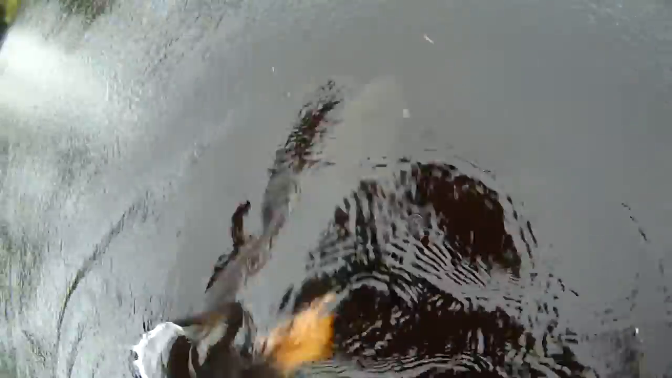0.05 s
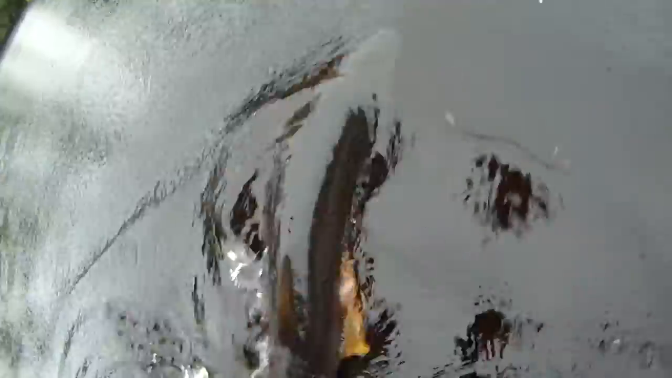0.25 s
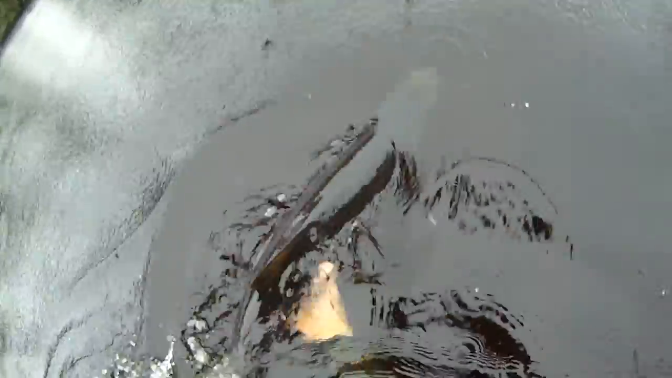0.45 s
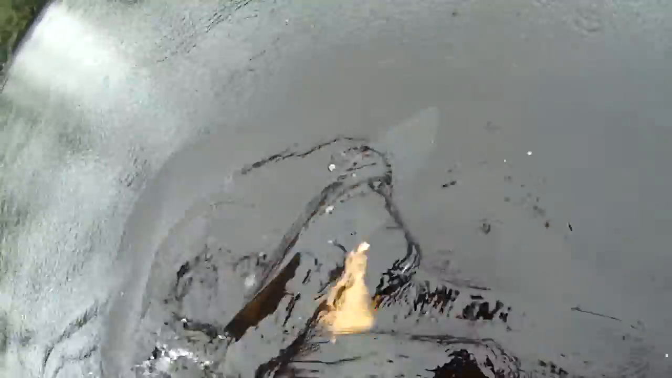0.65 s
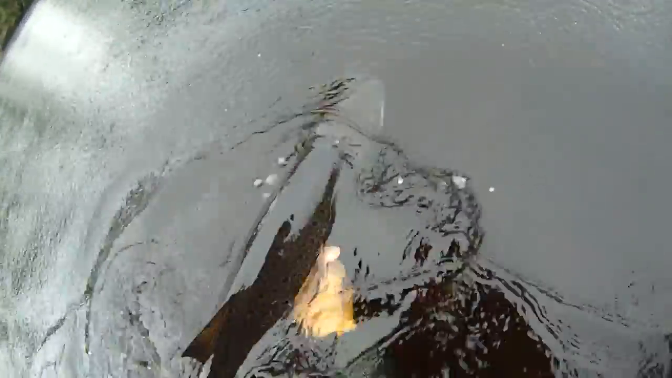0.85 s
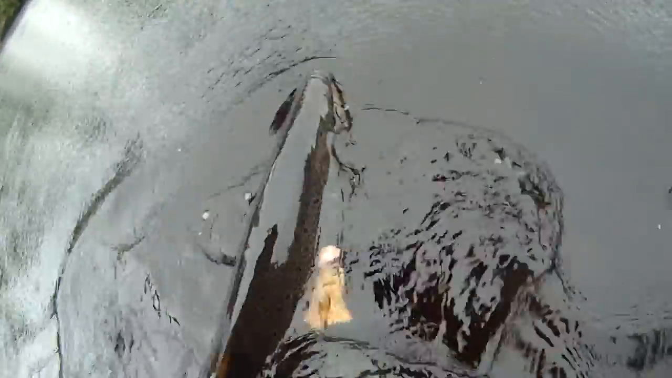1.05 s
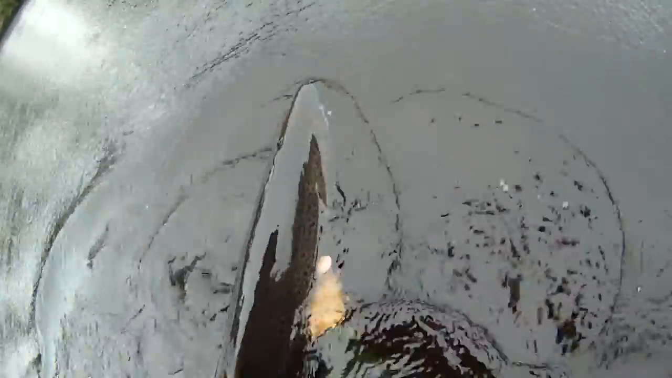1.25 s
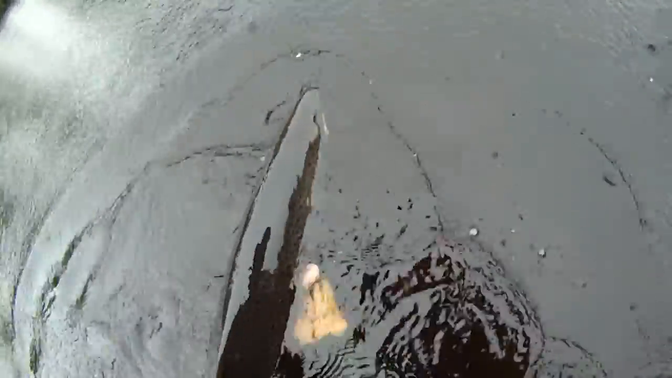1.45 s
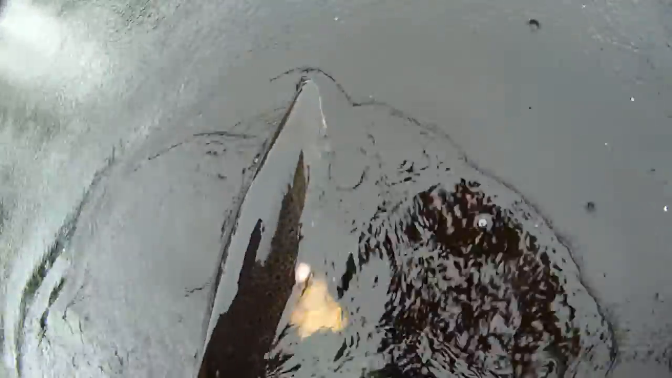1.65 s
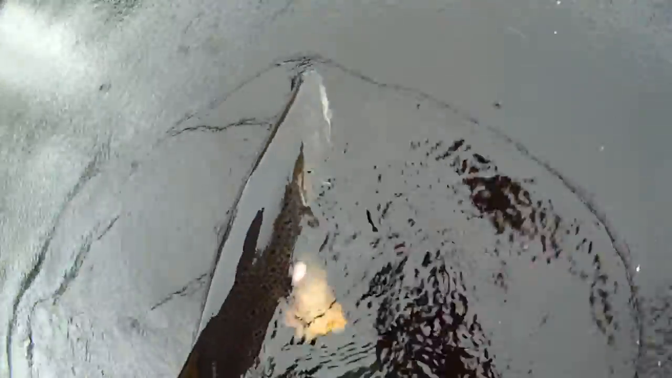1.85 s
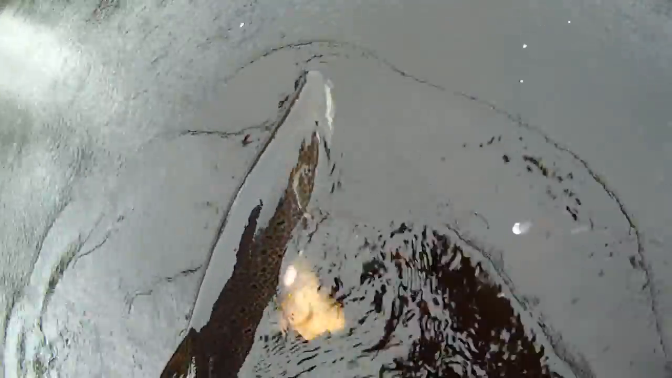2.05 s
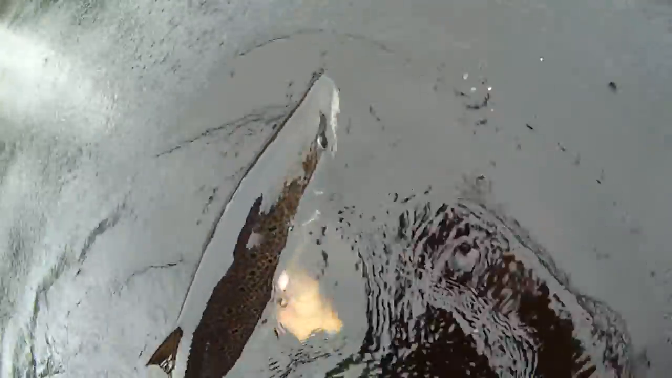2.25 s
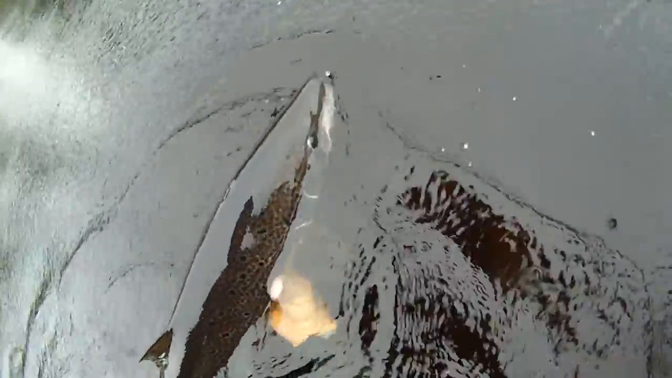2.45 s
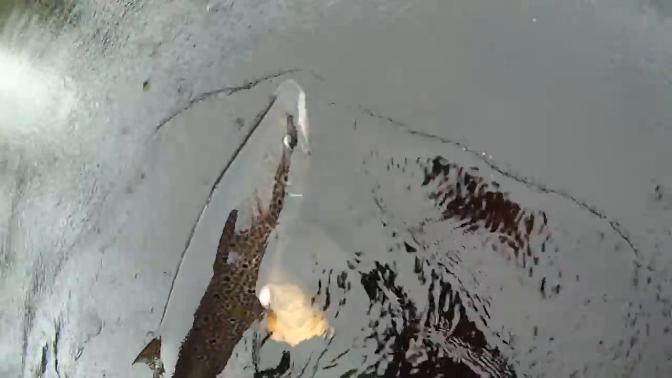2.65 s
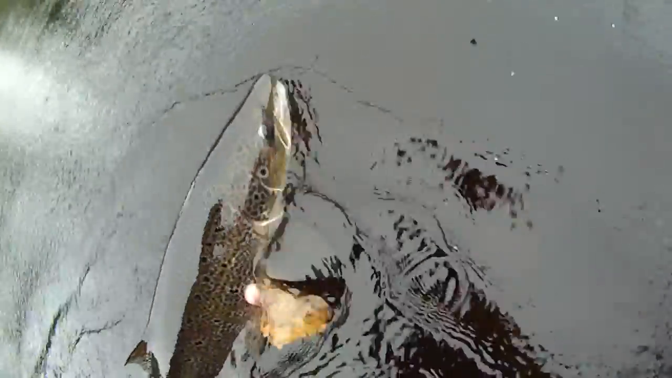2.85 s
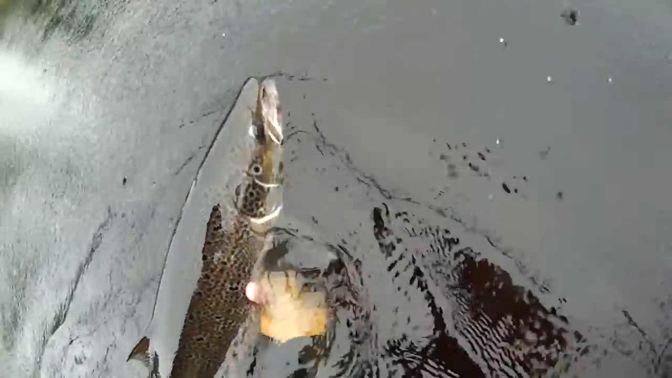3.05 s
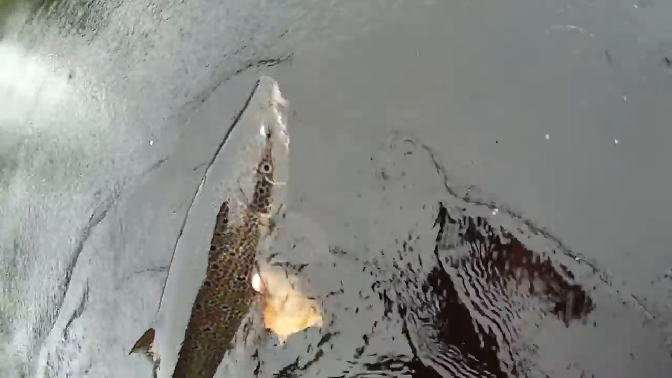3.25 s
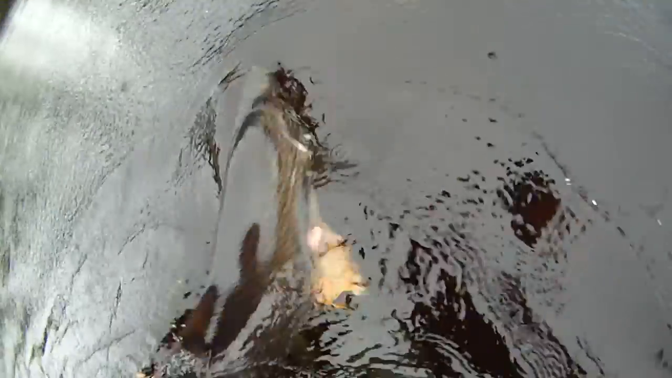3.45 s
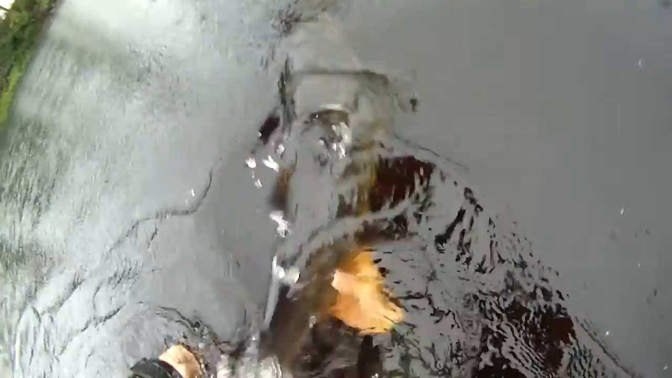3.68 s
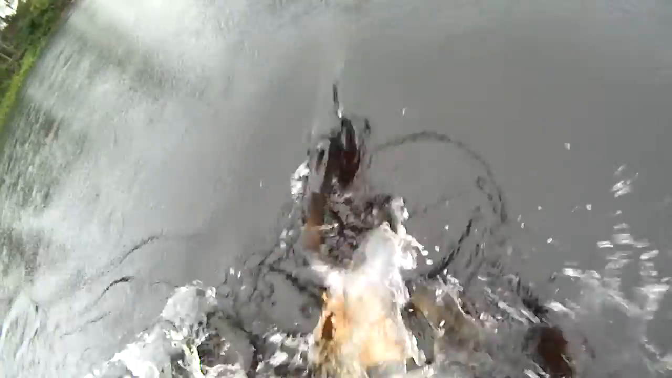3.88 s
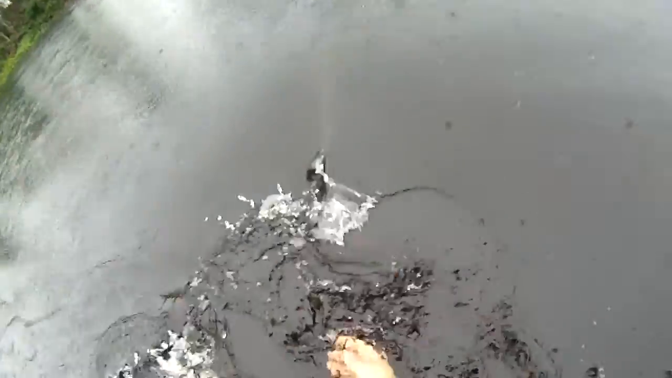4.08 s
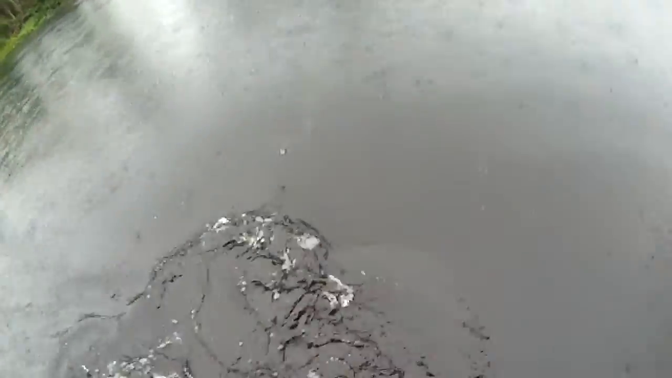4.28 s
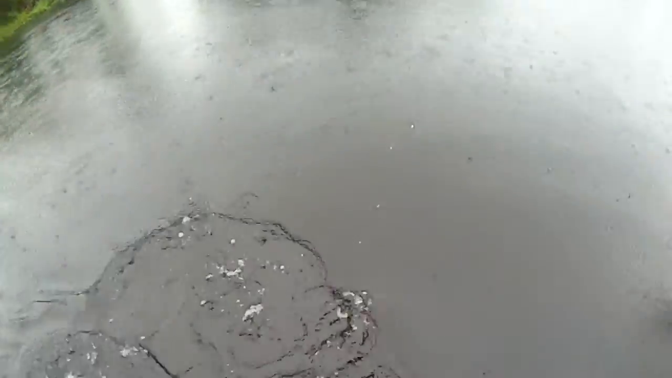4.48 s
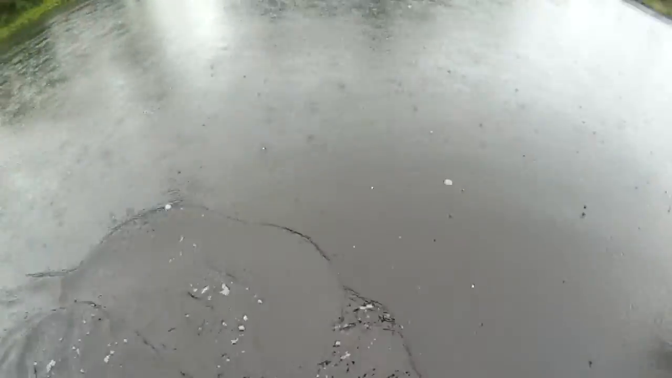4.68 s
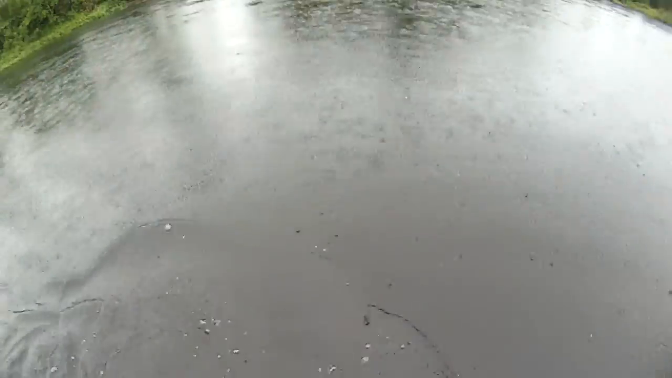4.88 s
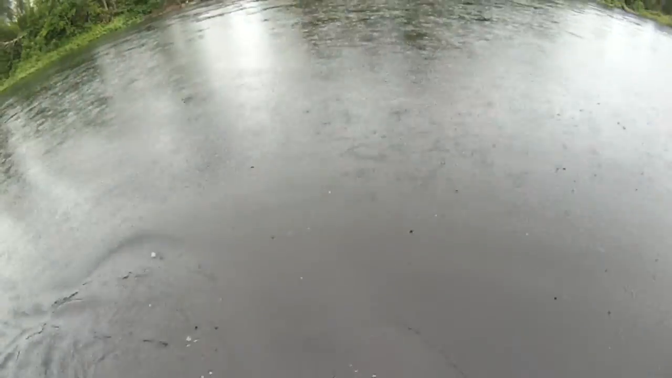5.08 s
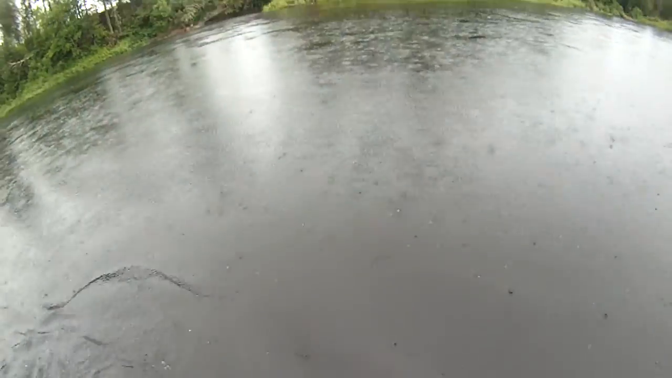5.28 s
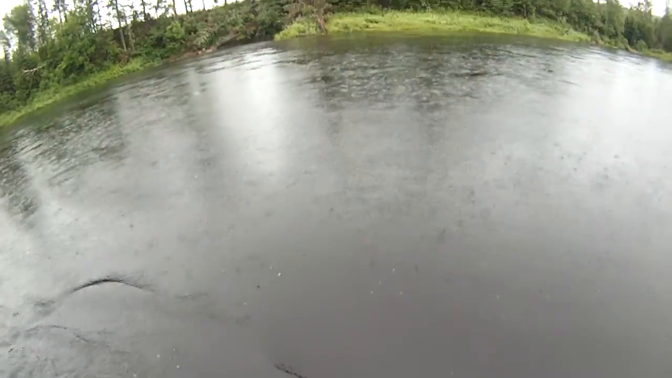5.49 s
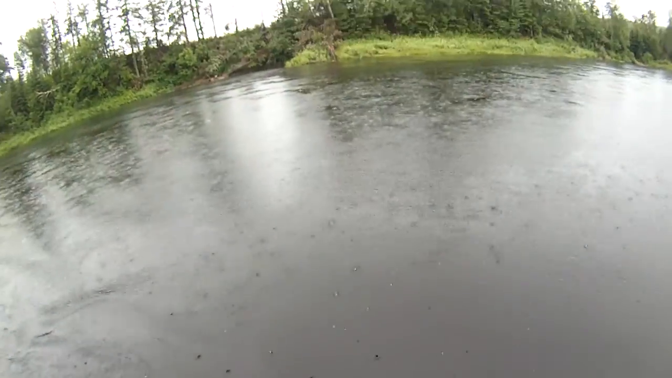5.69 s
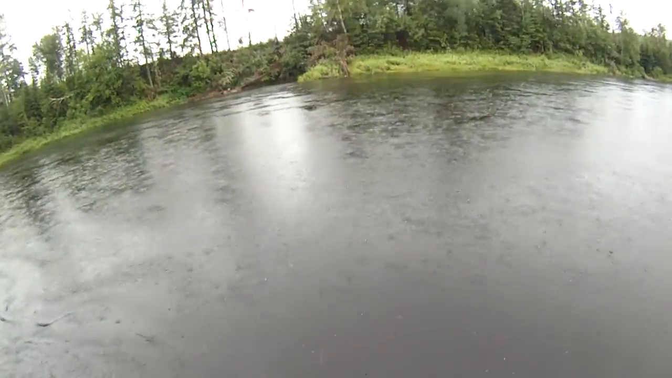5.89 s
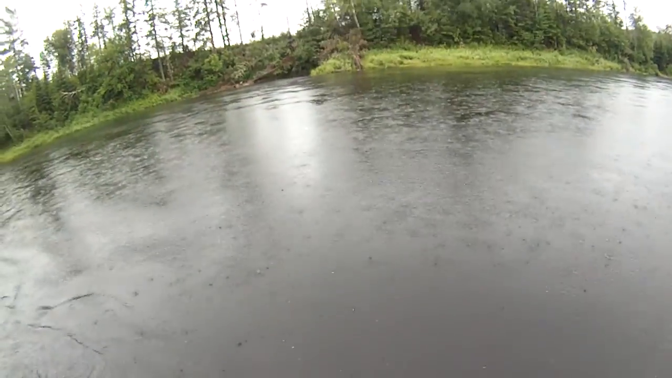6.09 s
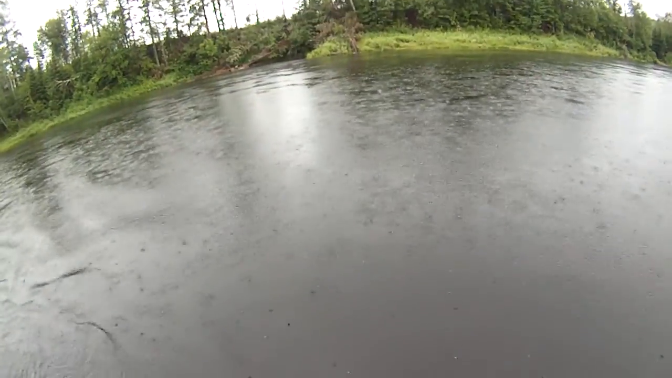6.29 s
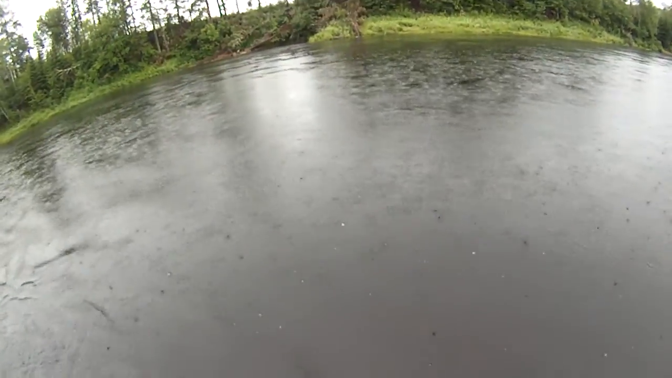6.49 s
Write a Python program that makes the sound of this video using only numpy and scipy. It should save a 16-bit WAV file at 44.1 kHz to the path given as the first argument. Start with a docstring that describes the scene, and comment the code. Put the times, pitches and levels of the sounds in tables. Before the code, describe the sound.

Close to the water, a large fish thrashes at once: muffled gurgling bubbles, wet slaps and hissing spray for under a second. It settles to faint rain and small taps. Past the middle it thrashes again, harder, with a strong slap and low slosh, and is gone. Small laps and drops knocking on the sealed microphone case remain.

```python
"""A slow river in light rain: a hand holds a large fish, which thrashes twice and swims off.
Each surge traps bubbles, heard as short dying tones, and throws spray, made of hiss and puffs of noise.
Low water sloshes underneath. Drops knock on the sealed case around the microphone and make it ring;
the case also muffles the treble of the bubbles. Rain is a steady wash of noise with faint taps."""
import sys
import numpy as np
from scipy import signal
from scipy.fft import rfft, irfft, next_fast_len
from scipy.io import wavfile
from scipy.ndimage import uniform_filter1d

SR = 44100
rng = np.random.default_rng(int(sys.argv[2]) if len(sys.argv) > 2 else 0)


def dump(signal):
    """Clip the signal to [-1, 1] and save it as 16-bit WAV at the path in sys.argv[1]."""
    limited = np.clip(np.atleast_2d(signal).T, -1, 1)
    pcm = np.round(limited * 32767).astype(np.int16)
    wavfile.write(sys.argv[1], SR, pcm)


def voltage_ratio(level):
    """Linear amplitude factor for a level in decibels (scalar or array-like)."""
    return 10 ** (np.asarray(level, float) / 20)


N = 287973  # length in samples

# How hard the water is stirred [t/s, churn level/dB, spray level/dB, low slosh level/dB]
STIRRING = [(0, -51, -58.5, -66), (0.09, -39, -54, -46), (0.12, -23.5, -41.5, -46), (0.3, -36, -44, -36.5),
            (0.36, -29, -49.5, -37.5), (0.471, -27, -37, -41), (0.55, -30.5, -40.5, -61),
            (0.68, -36, -43.5, -58), (0.76, -40, -53, -57.5), (1.021, -58.5, -62, -69),
            (1.25, -46.5, -63, -61.5), (1.6, -59.5, -71.5, -58), (1.998, -59, -69, -76.5),
            (2.4, -68, -75, -74.5), (3.201, -56, -69.5, -60.5), (3.439, -67, -68.5, -57.5),
            (3.52, -52, -57, -44), (3.55, -44, -45, -60), (3.659, -28.5, -37.5, -28.5),
            (3.761, -32, -38, -31), (3.95, -30, -41, -40), (4.15, -37, -44.5, -62),
            (4.32, -50, -59.5, -60.5), (4.8, -46, -55.5, -47.5), (5.3, -50, -56.5, -47.5),
            (5.52, -46.5, -54, -50.5), (5.75, -48.5, -65.5, -52), (6.101, -55, -70.5, -55.5),
            (6.3, -54, -57, -59.5), (6.53, -61, -67.5, -52.5)]
# Single large bubbles, before flutter and case wall
# [t/s, level/dB, start f/Hz, time to fade by 60 dB/s, pitch rise/(kHz per s)]
BIG_BUBBLES = [(0.012, -32.5, 609, 0.17, 12), (0.1038, -16, 766, 0.03, 46.5), (0.1485, -17, 493, 0.033, -4),
               (0.163, -20, 220, 0.09, 0), (0.1662, -17.5, 610, 0.046, 6), (0.178, -18, 1080, 0.041, 5.5),
               (0.2036, -16, 884, 0.039, 9.5), (0.2197, -23, 482, 0.22, 1), (0.3539, -27.5, 832, 0.065, 12),
               (0.3631, -23, 314, 0.1, 23.5), (0.3683, -26, 243, 0.13, 1.5),
               (0.4473, -17, 1040, 0.061, 10.5), (0.4576, -18.5, 550, 0.065, 8),
               (0.4925, -20, 800, 0.068, 11.5), (0.5883, -22.5, 376, 0.17, 2),
               (0.6403, -16.5, 416.6, 0.2, 7), (0.7285, -28.5, 885, 0.11, 6),
               (0.7351, -29, 714, 0.099, 3.5), (0.936, -35, 610, 0.11, 5.5),
               (1.0175, -36.5, 983, 0.062, -1.5), (1.0876, -32, 1042, 0.038, -2),
               (2.474, -32.5, 130, 0.035, -0.5), (3.513, -26, 1020, 0.049, -3),
               (3.555, -21.5, 920, 0.0079, -16), (3.58, -23, 364, 0.056, 8),
               (3.6655, -17.5, 361, 0.093, 2.5), (3.6678, -23.5, 538, 0.29, 0.5),
               (3.7153, -18, 264, 0.13, 10), (3.7642, -22.5, 770, 0.086, 4.5),
               (3.8478, -23, 558, 0.054, 10.5), (3.8585, -23, 373, 0.086, 3.5),
               (3.9023, -24.5, 397, 0.13, 11), (4.2499, -27, 970, 0.055, 7), (4.415, -33.5, 132, 0.1, -0.5),
               (4.5811, -33, 423, 0.051, 7), (4.6975, -31, 967, 0.055, 14.5), (4.858, -33, 1140, 0.06, 3.5),
               (4.8723, -28.5, 164, 0.033, 4), (4.9957, -32.5, 190, 0.036, 12),
               (5.1172, -32.5, 613, 0.11, 1.5), (5.171, -40, 895, 0.18, 2.5), (5.3036, -35.5, 755, 0.11, 5),
               (5.3593, -24, 1050, 0.043, -0.5), (5.5759, -32.5, 258, 0.058, -3.5),
               (5.6367, -24.5, 184, 0.033, -1.5), (5.7039, -36.5, 689, 0.21, 2),
               (5.809, -34, 149, 0.048, 1), (5.989, -32.5, 186, 0.04, -2.5), (6.286, -31, 156, 0.059, 1)]
# Drops and slaps of water on the case [t/s, level/dB, f/Hz, thump level/dB, crack level/dB];
# thump and crack are relative to the first push
CASE_KNOCKS = [(0.1085, -19.5, 480, -29, -10.5), (0.1244, -8, 800, -46, -26),
               (0.1301, -12.5, 645, -36, -31), (0.2293, -14, 705, -24.5, -41),
               (0.579, -22, 910, -34.5, -35), (0.638, -20, 450, -31.5, -17),
               (0.827, -25.5, 918, -37, -15.5), (0.838, -20, 840, -42, -35.5), (1.1852, -22, 920, -39, -46),
               (1.2169, -26, 992, -19.5, -24), (1.371, -24, 910, -17, -44), (1.8204, -32, 760, -30, -27),
               (2.339, -37, 746, -18, -10), (2.462, -28, 755, -23, -17), (2.5998, -25, 943, -17.5, -17.5),
               (2.702, -36, 950, -38, -21), (3.0025, -25.5, 1010, -29, -25.5), (3.049, -30, 750, -18, -11),
               (3.119, -35, 620, -30, -11), (3.1858, -27, 985, -28, -19), (3.6334, 1, 659, -24, -27),
               (3.7192, -9, 530, -25, -36), (3.7417, -19, 1097, -22, -20), (3.7508, -11, 830, -32, -34),
               (3.7588, -9.5, 593, -39, -44), (3.8289, -17, 720, -38, -31), (3.9474, -12, 714, -35, -40),
               (4.0404, -21, 820, -27, -30), (4.2846, -25.5, 675, -23, -39), (4.561, -28.5, 1050, -6, -20),
               (4.5728, -29, 1067, -31.5, -31), (4.6665, -23, 910, -10, -33), (4.7821, -24, 890, -14, -33),
               (4.8251, -23, 780, -7.5, -14.5), (4.946, -16.5, 860, -8, -28),
               (5.1922, -15.5, 682, -32, -26), (5.2209, -21.5, 970, -5.5, -24),
               (5.3179, -16, 873, -24, -39), (5.495, -19.5, 838, -20, -43), (5.747, -25.5, 814, -20, -19),
               (5.9437, -4, 856, -18.5, -43.5), (6.1601, -16.5, 860, -12.5, -29),
               (6.285, -33.5, 960, -20, -26.5), (6.5243, -19.5, 544, -14, -14)]
# Droplets pricking the surface [t/s, level/dB, f/Hz]
SURFACE_DROPLETS = [(0.101, -28, 5900), (0.3187, -30.5, 6100), (0.4188, -30.5, 5760), (0.443, -30, 3140),
                    (0.4965, -28, 6500), (0.6886, -28, 5900), (0.7848, -41, 11000), (0.914, -40, 6070),
                    (1.049, -47.5, 12860), (3.0143, -42.5, 10200), (3.048, -40.5, 2500),
                    (3.5118, -23, 9260), (3.543, -27, 5200), (3.6085, -31, 6700), (3.6298, -30, 6040),
                    (3.66, -28, 6000), (3.7022, -24, 9700), (3.7305, -25, 9500), (3.7888, -31, 10700),
                    (4.62, -34, 6260), (4.965, -45, 10400), (4.998, -47, 10800), (5.1574, -39, 2970),
                    (5.1914, -33, 2260), (5.269, -41, 6160), (5.355, -45.5, 12800), (5.3913, -39.5, 5800),
                    (5.456, -35.5, 2770), (5.49, -41, 8200), (5.6478, -38.5, 2990), (5.9433, -40.5, 4670),
                    (6.2624, -43, 6400), (6.3122, -43, 7100)]
# How the case rings after a knock [f/Hz, level/dB, time to fade by 60 dB/s]
CASE_RINGS = [(335.5, -17.5, 0.03), (715, -16.5, 0.023), (922, -16.5, 0.0092), (1397, -34, 0.032)]
# Tone colour of the bubbles as heard through the case [f/Hz, level/dB]
CHURN_COLOUR = [(76, -50), (130, -54), (157, -34), (209, -13), (615, 2.5), (1110, 2.5), (1410, -17.5),
                (1600, -20.5), (2080, -29), (3520, -120)]
# Tone colour of the spray [f/Hz, level/dB]
SPRAY_COLOUR = [(800, -22), (1500, -5), (1900, 4.5), (2400, -5), (3100, -0.5), (4300, -9.5), (4900, -0.5),
                (6500, 0.5), (9500, 0.5), (12000, -2.5), (15500, -7)]
# Tone colour of the low slosh [f/Hz, level/dB]
SLOSH_COLOUR = [(20, 1), (60, -9.5), (110, 2), (200, 1), (350, -1), (800, -42)]
# Tone colour of the far rain [f/Hz, level/dB]
RAIN_COLOUR = [(18, -55), (30, -0.5), (187, -3), (249, -2), (432, -4), (728, 4), (1050, -13), (1260, -4),
               (1680, -9), (1910, -8.5), (8280, -16.5), (14300, -18), (15500, -15)]
# A hollow in the spray's treble that slides as the case tilts away from the water [t/s, f/Hz]
TREBLE_HOLLOW = [(0.5, 9000), (3.6, 9000), (3.9, 8240), (4.6, 7895), (5.1, 9080), (5.55, 10340),
                 (6.53, 9260)]


def evened(x):
    """Scales a sound to an rms of 1."""
    return x / np.sqrt(np.mean(x ** 2) + 1e-20)


def add(mix, s, sound):
    """Adds a sound to the mix at time s in seconds."""
    part = mix[round(s * SR):][:len(sound)]
    part += sound[:len(part)]


def banded(x, low_hz, high_hz):
    """A broad band-pass."""
    edges_hz = [low_hz, min(high_hz, 0.45 * SR)]
    return signal.sosfilt(signal.butter(2, edges_hz, "bandpass", fs=SR, output="sos"), x)


def without_lows(x, hz):
    """Takes away what lies below hz, without delay."""
    return signal.sosfiltfilt(signal.butter(2, hz, "highpass", fs=SR, output="sos"), x)


def coloured(x, points):
    """Flattens the long-term spectrum and gives it the listed tone colour, at an rms of 1."""
    size = next_fast_len(N)
    spectrum = rfft(x, size)
    f, db = np.transpose(points)
    hz = np.fft.rfftfreq(size, 1 / SR)
    own = np.sqrt(uniform_filter1d(abs(spectrum) ** 2, size=1500)) + 1e-9
    wanted = voltage_ratio(np.interp(np.log(hz + 1), np.log(f + 1), db))
    return evened(irfft(spectrum / own * wanted, size)[:N])


def wander(size):
    """A slow random swing with an rms of 1, smoothed over so many samples."""
    return evened(uniform_filter1d(rng.standard_normal(N), size=size))


def ring(hz, t60, rise=0., attack=0.0012):
    """A dying sine whose pitch may slide, as a bubble's does near the surface; rise in kHz per s."""
    t = np.arange(int(t60 * SR) + 8) / SR
    shape = voltage_ratio(-60 * t / t60) * (1 - np.exp(-t / attack))
    return shape / shape.max() * np.sin(2 * np.pi * (hz * t + 500 * rise * t ** 2))


def grains(per_s, low_hz, high_hz, cycles, spread_db, clump_db, climb, count=32):
    """A random swarm of short rings in clumps; a few are much larger than the rest."""
    clumps = voltage_ratio(clump_db * wander(900))
    draw, size, kind = rng.random((3, N))
    strength = voltage_ratio(spread_db * np.minimum(-np.log(size + 1e-9), 5))
    train = (draw < per_s / SR) * strength * clumps
    pitch_class = (kind * count).astype(int)
    out = np.zeros(N)
    for k, hz in enumerate(np.geomspace(low_hz, high_hz, count)):
        t60 = cycles / hz * rng.uniform(1.0, 3.66)
        grain = ring(hz, t60, climb * rng.random() * hz / t60 / 1000, attack=0.11 / hz)
        grain = evened(grain) / np.sqrt(len(grain) * hz)
        out += signal.oaconvolve(train * (pitch_class == k), grain)[:N]
    return evened(out)


def knock(hz, thump_db, crack_db):
    """A short push of about one and a half cycles, a bounce, the ringing case, a late thump and a crack."""
    t = np.arange(3000) / SR
    push = -np.cos(2 * np.pi * hz * (t - 0.974 / hz)) * np.exp(-((t * hz - 0.95) / 0.62) ** 2)
    out = push.copy()
    add(out, 0.0032, voltage_ratio(-14) * push)  # the bounce
    for mode_hz, db, t60 in CASE_RINGS:
        add(out, 0.0012, voltage_ratio(db) * ring(mode_hz, t60))
    thump = ring(190 * rng.uniform(0.52, 1.47), 0.04, attack=0.00088)
    add(out, 0.005, voltage_ratio(thump_db) * thump)
    crack = banded(rng.standard_normal(len(t)) * np.exp(-t / 0.002), 930.0, 2740.0)
    return out + voltage_ratio(crack_db) * crack / abs(crack).max()


def rain():
    """Far rain on the river as a wash of noise, and faint drops tapping the case at three pitches."""
    out = voltage_ratio(-61.5) * coloured(rng.standard_normal(N), RAIN_COLOUR)
    for hz in (620, 800, 1000):
        draw, size = rng.random((2, N))
        taps = (draw < 18 / SR) * voltage_ratio(-45 - 0.93 * np.log(size + 0.19))  # about 18 a second
        out += signal.oaconvolve(taps, knock(hz, -15.5, -19))[:N]
    return out


def slosh(slosh_db, dense):
    """Large, low bubbles and noise; froth breaks up the deepest pockets of air."""
    swarm = grains(220, 50, 350, 6., 2.5, 2.2, 0.3) + 0.4 * rng.standard_normal(N)
    deep = coloured(swarm, SLOSH_COLOUR)
    shallow = without_lows(deep, 185.)
    return voltage_ratio(slosh_db) * (dense * 0.91 * shallow + (1 - dense) * deep)


def spatter(per_s, spread_db, t60):
    """Droplets bursting: sparse, quickly fading puffs of noise in five pitch bands."""
    out = np.zeros(N)
    puff = voltage_ratio(-60 * np.arange(900) / SR / t60)
    for hz in np.geomspace(1500, 9000, num=5):
        draw, size = rng.random((2, N))
        train = (draw < per_s / SR) * voltage_ratio(spread_db * np.minimum(-np.log(size + 1e-9), 4))
        noise = signal.oaconvolve(train, puff)[:N] * rng.standard_normal(N)
        out += banded(noise, hz, 2.0 * hz)
    return out


def hollowed(x, width_hz, depth, times=1):
    """Shifts the sliding hollow down to zero, smooths both ways, shifts back and takes that band away."""
    s, hz = np.transpose(TREBLE_HOLLOW)
    path_hz = np.interp(np.arange(N) / SR, s, times * hz)
    turn = np.exp(2j * np.pi * np.cumsum(path_hz) / SR)
    band = signal.filtfilt(*signal.butter(1, width_hz / 2, fs=SR), x / turn)
    return x - depth * 2 * (band * turn).real


def spray(spray_db, dense):
    """Tiny rings, noise and bursting droplets: heavy spray fuses into hiss, light spray patters."""
    swarm = grains(2500, 1528, 16150, 33.0, 3.1, 2.34, 0.995) + 0.51 * rng.standard_normal(N)
    hiss = coloured(swarm, SPRAY_COLOUR)
    patter = coloured(spatter(80, 3.0, 0.015), SPRAY_COLOUR)
    both = np.sqrt(dense) * hiss + np.sqrt(1 - dense) * patter
    both = hollowed(both, 1500, 0.66)
    return voltage_ratio(spray_db) * hollowed(both, 3000, 0.4, times=1.81)  # a second, higher hollow


def churn(churn_db):
    """A dense swarm of ringing bubbles with some noise, heard through the case."""
    swarm = grains(1600, 140, 1700, 10., 2.5, 1.5, 0.5) + 0.6 * rng.standard_normal(N)
    return voltage_ratio(churn_db) * coloured(swarm, CHURN_COLOUR)


def water():
    """Churn, spray and low slosh follow the stirring of the water."""
    s, *levels = np.transpose(STIRRING)
    churn_db, spray_db, slosh_db = (np.interp(np.arange(N) / SR, s, db) for db in levels)
    dense = np.clip((spray_db + 60) / 22, 0.2, 0.93)  # how closely packed the spray is
    return churn(churn_db) + spray(spray_db, dense) + slosh(slosh_db, dense)


def droplet(hz, puff_db):
    """A tiny ringing bubble inside a puff of noise."""
    out = ring(hz, 0.0056, 0.043 * hz, attack=0.0001)
    fade = np.exp(-np.arange(len(out)) / SR / 0.004)
    puff = banded(rng.standard_normal(len(out)) * fade, 0.49 * hz, 1.2 * hz)
    return out + voltage_ratio(puff_db) * puff / abs(puff).max()


def droplets():
    """Droplets pricking the surface; the smaller (higher) ones are more puff than ring."""
    out = np.zeros(N)
    for s, db, hz in SURFACE_DROPLETS:
        puff_db = -2.5 + 1.5 * np.log2(hz / 5000)  # grows 1.5 dB per octave
        add(out, s, voltage_ratio(db) * droplet(hz, puff_db))
    return out


def knocks():
    """Single drops and slaps of water hitting the case."""
    out = np.zeros(N)
    for s, db, hz, thump_db, crack_db in CASE_KNOCKS:
        add(out, s, voltage_ratio(db) * knock(hz, thump_db, crack_db))
    return out


def froth(count=120):
    """Lesser bubbles and slaps at random moments, crowded and strong where the churn is strong."""
    gurgle_db, slap_db = 2.5, 1.5  # over the churn
    s, churn_db = np.transpose(STIRRING)[:2]
    t = np.arange(0, N / SR, 0.005)
    share = np.cumsum(voltage_ratio(0.6 * np.interp(t, s, churn_db)))
    bubbles, slaps = np.zeros((2, N))
    for k, (when, pitch, life, climb, size) in enumerate(rng.random((count, 5))):
        at = np.interp((k + when) / count, share / share[-1], t)
        db = np.interp(at, s, churn_db) + 3.7 * (size - 0.5)
        if k % 3:  # two bubbles for each slap
            hz = 330 * 3.4 ** pitch
            t60 = 0.0487 * (0.51 + life)
            add(bubbles, at, voltage_ratio(db + gurgle_db) * ring(hz, t60, climb * hz / t60 / 1000))
        else:
            add(slaps, at, voltage_ratio(db + slap_db) * knock(520 + 560 * pitch, -27, -36))
    return bubbles, slaps


def thrashing():
    """The bubbles, slaps, knocks and droplets that stand out, with the case wall's filtering."""
    wall_low_hz, wall_high_hz = 127, 1420
    bubbles, slaps = froth()
    for s, db, hz, t60, rise in BIG_BUBBLES:
        add(bubbles, s, voltage_ratio(db) * ring(hz, t60, rise))
    bubbles *= voltage_ratio(1.44 * wander(250))  # ripples make them flutter
    bubbles = signal.sosfilt(signal.butter(6, wall_high_hz, fs=SR, output="sos"), bubbles)
    return without_lows(bubbles + slaps + knocks() + droplets(), wall_low_hz)


def scene():
    """Everything reaches one microphone."""
    return (rain() + water() + thrashing())[None]


def band_limit(x):
    """A steep low-pass at the top of the band."""
    return signal.sosfilt(signal.butter(12, 16610, fs=SR, output="sos"), x)


def record(dry):
    """Cuts the highest treble, above 15420 Hz, and finishes the mix."""
    limited = signal.oaconvolve(dry, signal.firwin(511, 15420, fs=SR)[None], "same")
    return band_limit(limited)


dry = scene()
out = record(dry)
dump(out)
```